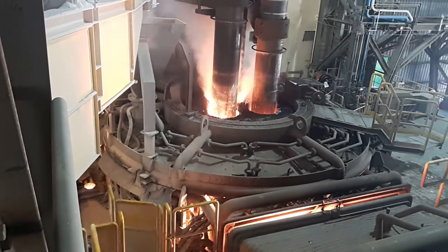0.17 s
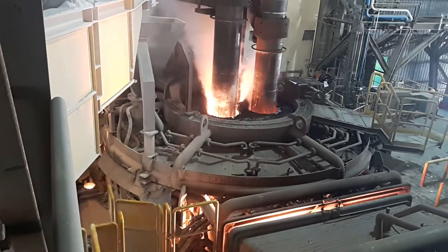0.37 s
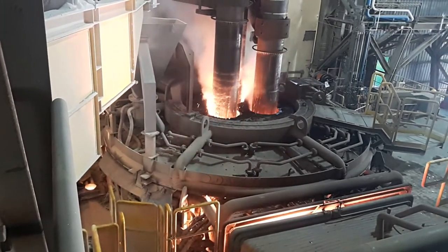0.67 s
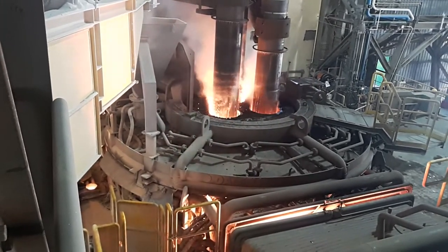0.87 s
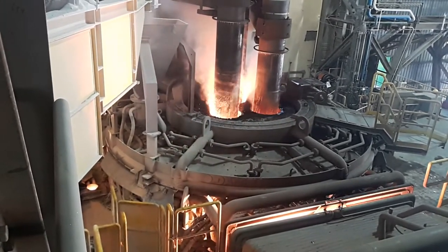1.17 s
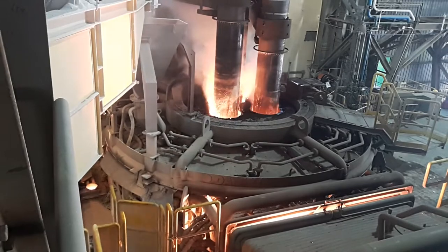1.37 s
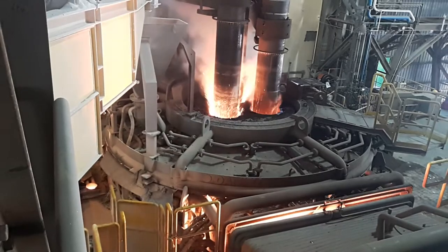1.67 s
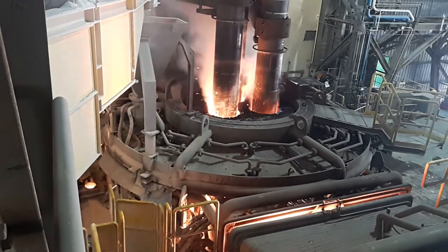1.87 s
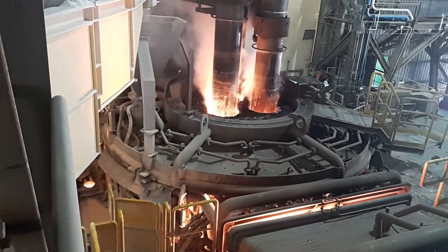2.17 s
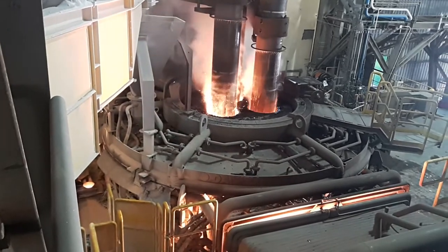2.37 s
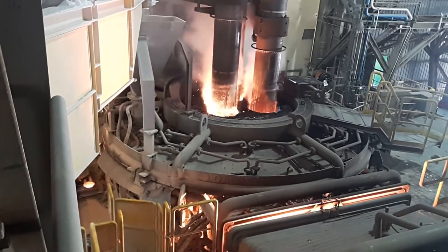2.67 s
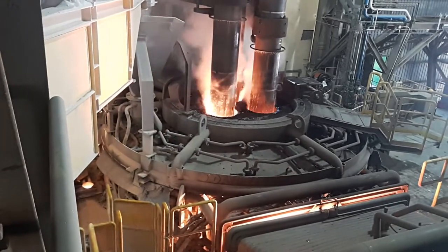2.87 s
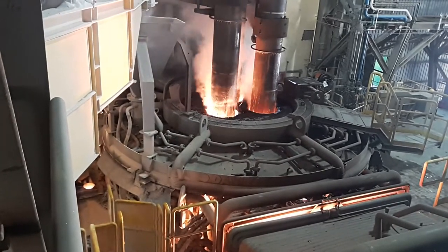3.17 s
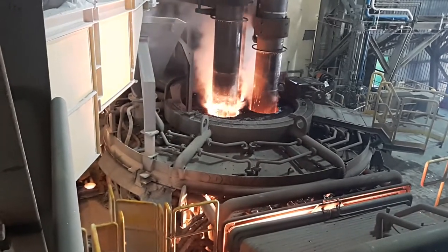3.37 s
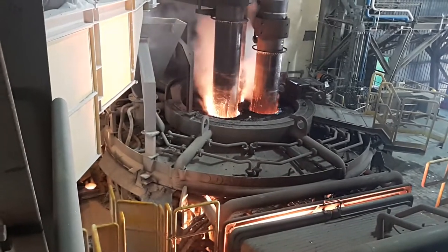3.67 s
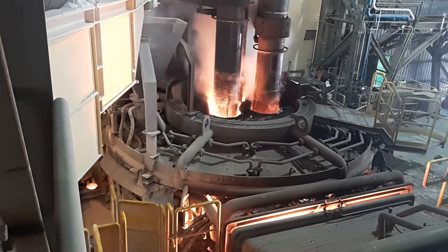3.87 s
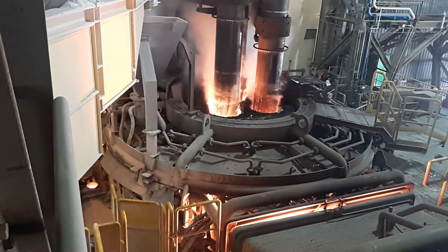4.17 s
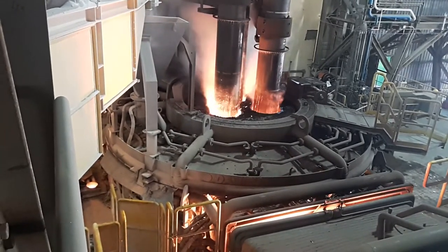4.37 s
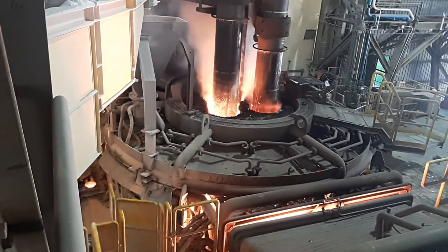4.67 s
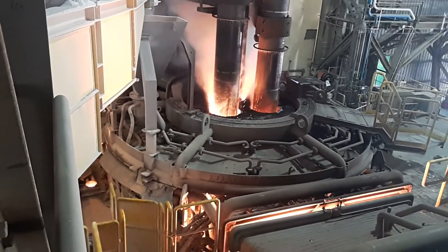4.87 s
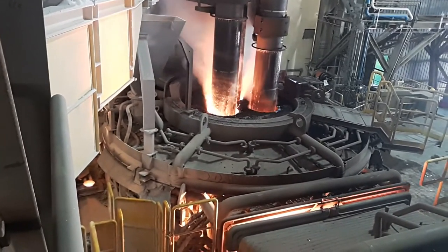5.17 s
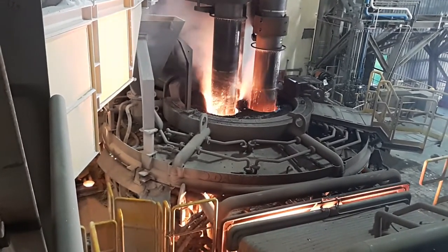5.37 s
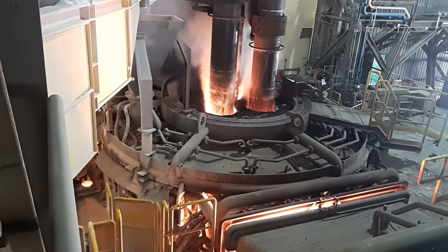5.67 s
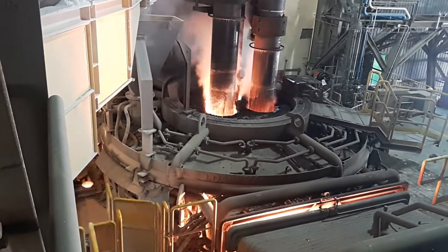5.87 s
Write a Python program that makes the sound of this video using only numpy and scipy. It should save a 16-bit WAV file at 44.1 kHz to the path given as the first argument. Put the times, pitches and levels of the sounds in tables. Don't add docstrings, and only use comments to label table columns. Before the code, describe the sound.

A furnace runs continuously: a heavy twice-mains hum with rough, fluttering harmonics, mixed with a breathy low flame roar and thin fizz. Irregular crackles spit over it, some sharp and bright, others duller with a short hall tail, strongest at the very end. The microphone stands on a gallery inside a big industrial hall, wide stereo, dense and loud, with faint input hiss and slight overload.

```python
import sys
import numpy as np
from scipy import signal
from scipy.fft import rfft, irfft, next_fast_len
from scipy.io import wavfile
from scipy.ndimage import uniform_filter1d, map_coordinates

SR = 44100
rng = np.random.default_rng(int(sys.argv[2]) if len(sys.argv) > 2 else 0)


def convert_level_to_amplitude(level_db):
    exponent = np.asarray(level_db, float) / 20
    return 10 ** exponent


def wav_record(signal):
    frames = np.transpose(np.atleast_2d(signal))
    bounded = np.clip(frames, -1, 1)
    quanta = np.round(bounded * 32767).astype(np.int16)
    wavfile.write(sys.argv[1], SR, quanta)


N = 264776
TIME_S = np.arange(N) / SR
ARC_HZ = 99.73


def unit(x):
    return x / np.sqrt(np.mean(np.abs(x) ** 2) + 1e-20)


def along(points, hz):
    f, v = np.transpose(points)
    return np.interp(np.log(hz + 1), np.log(f + 1), v)


def curve(points):
    s, v = np.transpose(points)
    return np.interp(TIME_S, s, v)


def wobble(rate_hz):
    return map_coordinates(rng.standard_normal(1300), [TIME_S * rate_hz])


def pan(left_right_db):
    return convert_level_to_amplitude(left_right_db * np.array([[.5], [-.5]]))


def filtered(x, response):
    m = next_fast_len(N + 8192)
    return irfft(rfft(x, m) * response(np.fft.rfftfreq(m, 1 / SR)), m)[..., :N]


# freq_hz, correlation
LIKENESS = [(30, .84), (60, .93), (130, .95), (290, .8), (640, .8), (1410, .14), (3100, .09), (6820, .02),
            (15000, .05)]
# freq_hz, left_right_db
BALANCE = [(60, 2), (110, 2), (200, .5), (380, 2.5), (700, 1), (1290, 1), (2380, 4), (4400, 3),
           (8120, -2.5), (15000, 1)]


def rush(gain, patchy_db):
    z = signal.stft(rng.standard_normal((2, N)), nperseg=512)[2]
    field = rng.standard_normal(z.shape[1:])
    field = uniform_filter1d(field, size=8, axis=0)
    field = uniform_filter1d(field, size=10, axis=1)
    pair = signal.istft(z * convert_level_to_amplitude(patchy_db * unit(field)), nperseg=512)[1][:, :N]

    def mid_side_gain(hz):
        angle = np.arccos(np.clip(along(LIKENESS, hz), -1, 1)) / 2
        return gain(hz) * np.array([np.cos(angle), np.sin(angle)])

    mid, side = filtered(pair, mid_side_gain)
    left_right = np.array([mid + side, mid - side])
    both = filtered(left_right, lambda hz: convert_level_to_amplitude(np.outer([.5, -.5], along(BALANCE, hz))))
    return both / np.sqrt(np.mean(both.mean(0) ** 2))


def shaped_rush(spectrum, patchy_db):
    return rush(lambda hz: convert_level_to_amplitude(along(spectrum, hz)), patchy_db)


def sway(rows):
    t = np.arange(0, N + 64, 64) / SR
    db = sum(change * 2 ** (-(2 * (t - s) / length) ** 2) for s, change, length in rows)
    return np.interp(TIME_S, t, db)


HUM_DB = [-16, -22, -16.5, -21, -29.5, -32.5]
UPPER_DB = [-8.5, -9.5]
# multiple, skirt_db, width_hz, drift_rad, left_right_db, right_lead_rad
WAVER = [(1.0, -17, 9, .12, 1.9, .16), (2.0, -10, 16, .9, .5, .15), (3.0, -15, 17, .45, 4.8, .24),
         (4.0, -14, 18, .5, .6, .27), (5.0, -3, 18, 1.1, .6, -.1), (6.0, -1, 20, 1.1, .6, -.2),
         (7.0, 3, 22, .9, .8, 0), (8.0, 3, 26, .9, .8, 0)]
# centre_s, change_db, length_s
SWAY_1 = [(0.662, 1.5, 0.062), (0.806, -3, 0.082), (1.95, -3.5, 0.054), (2.145, 2.5, 0.086),
          (2.34, -2.0, 0.16), (2.52, 2.5, 0.14), (2.94, 0, 0.1), (3.09, 3.5, 0.073), (3.2, -5.5, 0.063),
          (3.75, -3.0, 0.14), (4.254, 3, 0.14), (4.387, -7, 0.05), (4.99, -1.5, 0.55), (5.295, 2.5, 0.12),
          (5.713, -1.5, 0.23), (6.004, -5, 0.091)]
SWAY_2 = [(0.02, -17, 0.045), (0.09, 5.5, 0.045), (0.26, -9, 0.08), (0.53, -6.5, 0.094), (0.69, 4.5, 0.039),
          (0.81, -3, 0.052), (0.94, 6.5, 0.041), (1.06, 5.5, 0.036), (1.219, -21, 0.053), (1.4, 6.5, 0.15),
          (1.6, 5, 0.039), (1.77, 1.5, 0.13), (2.31, 3.5, 0.13), (2.46, -17, 0.045), (2.53, 7, 0.041),
          (2.73, 6, 0.22), (2.93, -7, 0.065), (3.11, 3.0, 0.22), (3.34, 8.5, 0.051), (3.53, 5, 0.045),
          (3.72, -9.0, 0.11), (3.93, -5.5, 0.065), (4.11, -11, 0.049), (4.21, 5, 0.11), (4.63, -5, 0.04),
          (4.88, 7.5, 0.18), (5.21, -10.5, 0.2), (5.48, -9, 0.06), (5.76, -9, 0.08), (5.9, -8, 0.04)]
SWAY_3 = [(0.06, -1.5, 0.24), (0.34, -8, 0.075), (0.49, 3.5, 0.08), (0.67, -5, 0.039), (0.76, -4.5, 0.033),
          (0.96, 1.5, 0.26), (1.63, -8.5, 0.055), (1.8, -4, 0.14), (2.19, -5, 0.045), (2.53, -12, 0.14),
          (2.69, -11, 0.041), (2.78, 2.5, 0.2), (3.03, -4.5, 0.04), (3.12, -26, 0.077), (3.21, 3.5, 0.042),
          (3.43, -9.5, 0.089), (3.53, 2, 0.051), (3.7, -8, 0.036), (3.82, 4.5, 0.071), (4.06, 2.5, 0.11),
          (4.25, -5.5, 0.041), (4.48, 5.5, 0.11), (4.87, -10, 0.04), (4.96, 2.5, 0.08), (5.23, -12, 0.037),
          (5.4, -16.5, 0.096), (5.54, -4.0, 0.06), (5.65, 4.5, 0.072), (5.83, -6, 0.08), (5.98, 4.0, 0.041)]
SWAY_4 = [(0.06, 5, 0.052), (0.15, -8, 0.074), (0.26, 6.5, 0.04), (0.38, 5.5, 0.08), (0.48, -7.0, 0.065),
          (0.64, 5.5, 0.068), (0.78, -9, 0.051), (0.89, -7, 0.045), (1.01, -10, 0.072), (1.37, -14.5, 0.18),
          (1.64, 6.5, 0.031), (1.95, -11.5, 0.12), (2.29, -10, 0.1), (2.68, 3, 0.22), (2.69, -18, 0.05),
          (2.97, 4, 0.13), (3.31, 6.5, 0.11), (3.5, -4.5, 0.097), (3.64, 6.0, 0.08), (3.84, -7.5, 0.041),
          (4.11, -12.5, 0.039), (4.46, -5.0, 0.22), (4.71, 7, 0.1), (4.8, 3.5, 0.045), (4.87, -8.0, 0.06),
          (5.34, 4, 0.13), (5.63, -10, 0.049), (5.69, 3.5, 0.037), (5.8, 2.5, 0.15), (5.97, -7.5, 0.04)]
SWAY_5 = [(0.13, 8, 0.07), (0.55, -4.5, 0.2), (1.16, 4, 0.1), (1.53, 5, 0.07), (1.67, -10, 0.065),
          (1.91, -12, 0.14), (2.31, -9, 0.1), (2.77, 7, 0.056), (3.37, 7.5, 0.07), (3.6, 3, 0.07),
          (3.87, 4.5, 0.17), (4.98, 7.5, 0.07), (5.3, -13, 0.07), (5.41, 5.5, 0.11), (5.69, 9, 0.17)]
SWAY_6 = [(0.02, 10.5, 0.12), (0.45, -8, 0.11), (0.86, 2, 0.065), (1.15, 11.5, 0.089), (1.36, 5.5, 0.11),
          (2.47, 11.5, 0.062), (2.93, -8.0, 0.07), (3.13, -9.0, 0.055), (3.31, 5, 0.16), (3.56, 2, 0.28),
          (4.41, -6.5, 0.28), (4.95, 4.5, 0.31), (5.32, -15, 0.091)]


def arcs():
    t = TIME_S + .00212
    sways = [SWAY_1, SWAY_2, SWAY_3, SWAY_4, SWAY_5, SWAY_6]
    levels = [db + sway(rows) for db, rows in zip(HUM_DB, sways)]
    sixth_sway_db = levels[-1] - HUM_DB[-1]
    levels += [HUM_DB[-1] + 0.44 * sixth_sway_db + db for db in UPPER_DB]
    out = np.zeros((2, N))
    for level_db, (k, skirt_db, width_hz, drift_rad, pan_db, lead_rad) in zip(levels, WAVER):
        skew_rad = (k - 1) / 2 - 2.2 * (k == 2)
        wander = (wobble(4) + wobble(13)) / np.sqrt(2)
        phase = 2 * np.pi * k * ARC_HZ * t + skew_rad + drift_rad * wander
        right_lead = lead_rad + 0.17 * (k - 1) * wobble(16)
        line = np.sqrt(2) * np.cos(phase + np.outer([-.5, .5], right_lead))
        skirt = rush(lambda hz: 1 / (1 + ((hz - k * ARC_HZ) / width_hz) ** 2), patchy_db=0)
        tone = pan(pan_db) * line + convert_level_to_amplitude(skirt_db) * skirt
        out += convert_level_to_amplitude(level_db) * tone / np.sqrt(1 + convert_level_to_amplitude(2 * skirt_db))
    return out


# time_s, level_db
FLAME = [(0.0, -30), (0.58, -29.5), (1.57, -29), (2.34, -28.5), (2.57, -28), (2.94, -29), (3.41, -28),
         (3.88, -29.5), (4.93, -29.5), (5.63, -28.5), (6.0, -27)]
# time_s, roar_change_db
DRAUGHT = [(0, 2), (.3, 3.5), (.65, -2), (.85, 0.5), (1.1, 0), (1.72, 1.5), (1.9, 0.5), (2.8, 0.4),
           (3.05, -1), (3.35, 2.5), (3.9, 0.5), (4.03, -2), (4.15, 2.4), (4.35, -0.7), (4.6, 0), (5.5, 0.2),
           (5.7, -2), (6, -1.5)]
# freq_hz, level_db_per_hz
ROAR = [(20, -40.5), (45, -18), (75, -15), (125, -6.5), (150, -2.5), (250, -3.5), (450, -6), (700, -10),
        (1000, -15), (1500, -21.5), (2200, -30), (4000, -59)]
HISS = [(530, -52), (900, -1.5), (1200, -7.5), (1450, -11), (2780, -13), (3100, -16), (4800, -21),
        (6000, -28), (8000, -40), (13000, -91)]
FIZZ = [(3000, -26), (4800, -4.5), (6500, 0), (8600, 4.5), (9500, 1), (10500, -11.5), (13500, -19),
        (16000, -32)]


def flames():
    strength_db = curve(FLAME)
    swing_db = strength_db - strength_db.mean()
    flutter = wobble(30)
    flicker = 1 + 0.085 * np.cos(2 * np.pi * ARC_HZ * TIME_S)
    roar_db = -28 + curve(DRAUGHT) + 6.5 + 0.64 * wobble(13) + 0.54 * flutter
    hiss_db = -35.5 + swing_db + 4.5 + 0.5 * flutter
    fizz_db = -46 + 0.7 * swing_db - 1.96 + 1.1 * flutter
    roar = convert_level_to_amplitude(roar_db) * flicker * shaped_rush(ROAR, patchy_db=1.0)
    hiss = convert_level_to_amplitude(hiss_db) * shaped_rush(HISS, patchy_db=0.98)
    fizz = convert_level_to_amplitude(fizz_db) * shaped_rush(FIZZ, patchy_db=-0.5)
    return roar + hiss + fizz


def whine():
    whine_hz, whine_db = 5254, -64
    tone = np.sqrt(2) * np.sin(2 * np.pi * whine_hz * TIME_S + 1.5 * wobble(2.2))
    return convert_level_to_amplitude(whine_db + 2.5 * wobble(3.8)) * tone * np.ones((2, 1))


# start_s, peak_db, brightness_db
SPARKS = [(0.049, -23, -5.5), (0.341, -25, -6.5), (0.51, -24, -9.5), (0.554, -26, -5.5), (1.388, -27, -18),
          (1.624, -28, -16), (1.927, -26, -6), (1.96, -21, -13), (1.984, -18.5, -15), (2.007, -16.5, -15),
          (2.034, -22, -14.5), (2.065, -18.5, -12.5), (2.129, -24, -16), (2.229, -21, -12),
          (2.489, -21, -11), (2.729, -24.5, -9.5), (2.99, -21, -14.5), (3.249, -25, -16.5),
          (3.338, -19, -25), (5.562, -21, -14), (5.921, -21, -20), (4.21, -21.5, -13), (5.231, -22, -9),
          (5.369, -20, -19), (5.429, -27, -7), (5.881, -18, -18), (5.905, -17, -13.5)]
# start_s, peak_db, brightness_db, left_right_db
SPITS = [(0.729, -28.5, -13, 11.5), (0.914, -39, -21.5, 11), (1.061, -26.5, -15.5, 5),
         (1.606, -27.5, -13.5, 5), (1.912, -27.5, -2, 4), (2.669, -23, -12, 2), (2.893, -20, -16, 1.5),
         (3.306, -29, -30, -5), (3.378, -17.5, -26, 1.5), (4.027, -36, -16, 1), (4.145, -20, -17.5, 7),
         (4.259, -22.5, -21, 4), (4.858, -20.5, -21, 5), (5.515, -23.5, -9, -2), (5.533, -17, -16.5, 3),
         (5.712, -31, -17, 8), (5.865, -14, -16, 0), (5.895, -17.5, -21, 8)]
# freq_hz, level_db_per_hz
SPIT_LOW = [(700, -45), (1500, -2), (2500, -1), (4500, -8.5), (6500, -19), (9000, -54.5)]
SPIT_HIGH = [(3500, -40), (5200, -1), (7000, 0), (9000, -2), (10500, -13), (13000, -17), (16000, -21)]


def spitting():
    spit_rise_s, spit_t60_s = 0.0028, 0.25
    spark_rise_s, spark_t60_s, spark_pan_db = 0.0017, 0.099, 2.5
    bursts = [(*row, spit_rise_s, spit_t60_s) for row in SPITS]
    bursts += [(*row, spark_pan_db, spark_rise_s, spark_t60_s) for row in SPARKS]
    u = np.arange(SR // 2) / SR
    dull_power, bright_power = np.zeros((2, 2, N + SR))
    for start_s, peak_db, bright_db, pan_db, rise_s, t60_s in bursts:
        start = round(start_s * SR)
        span = slice(start, start + len(u))
        swell = (1 - np.exp(-u / rise_s)) * convert_level_to_amplitude(peak_db - 10.5 - 60 * u / t60_s) * pan(pan_db)
        dull_power[:, span] += swell ** 2
        bright_power[:, span] += (swell * convert_level_to_amplitude(bright_db + 5.5 - 31 * u)) ** 2
    low = np.sqrt(dull_power[:, :N]) * shaped_rush(SPIT_LOW, patchy_db=0)
    high = np.sqrt(bright_power[:, :N]) * shaped_rush(SPIT_HIGH, patchy_db=0)
    grit = unit(convert_level_to_amplitude(1.5 * wobble(170)))
    return grit * (low + high)


def scene():
    return arcs() + flames() + whine() + spitting()


# freq_hz, level_db_per_hz
SELF_NOISE = [(7000, -34.5), (10500, -3.5), (13500, -4.5), (15000, -5), (15800, 0)]


def input_hiss():
    return convert_level_to_amplitude(-54.5) * shaped_rush(SELF_NOISE, patchy_db=1.5)


def band_limit(x):
    return signal.sosfilt(signal.butter(12, 16540, fs=SR, output="sos"), x)


def record(dry):
    noisy = dry + input_hiss()
    soft = noisy / (1 + np.abs(noisy / 0.98) ** 6) ** (1 / 6)
    top_hz = 15790
    mix = filtered(soft, lambda hz: hz < top_hz)
    return band_limit(mix)


dry = scene()
out = record(dry)
wav_record(out)
```